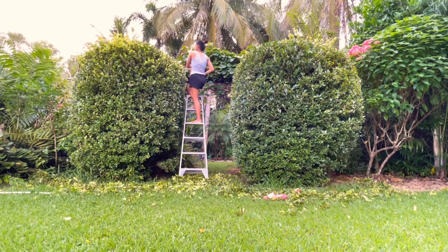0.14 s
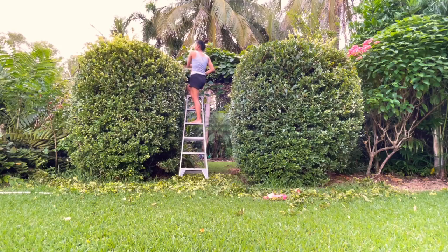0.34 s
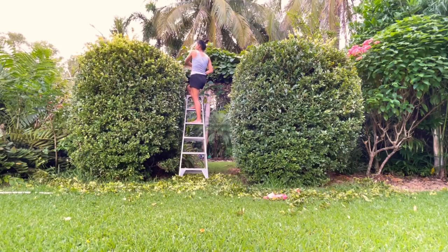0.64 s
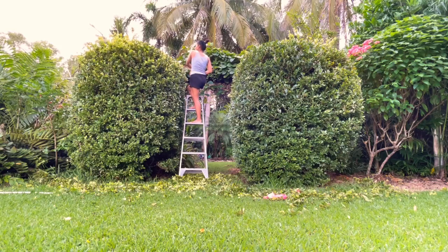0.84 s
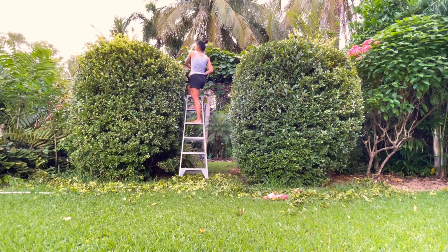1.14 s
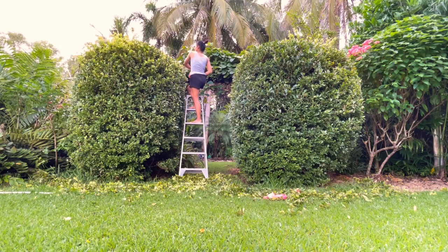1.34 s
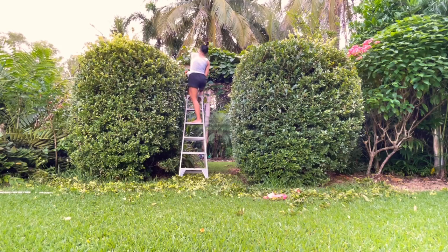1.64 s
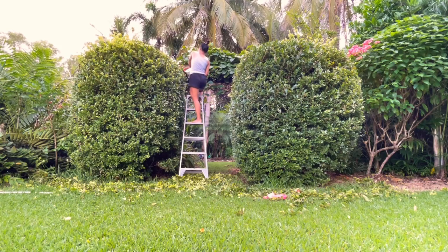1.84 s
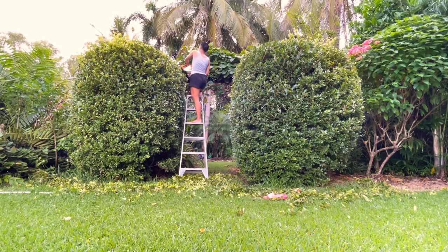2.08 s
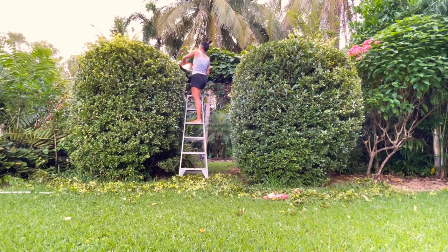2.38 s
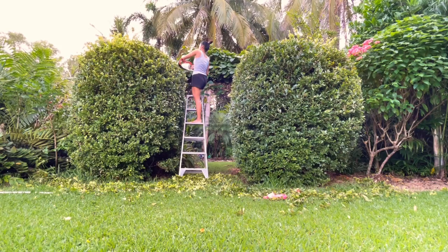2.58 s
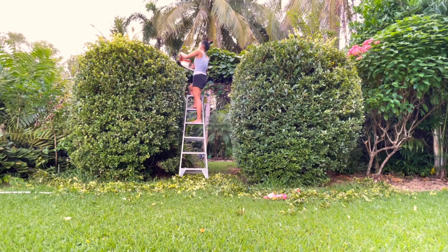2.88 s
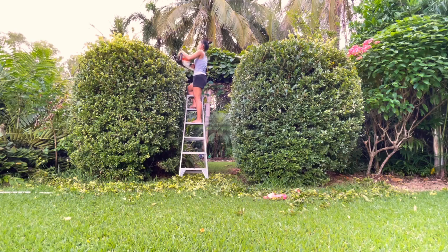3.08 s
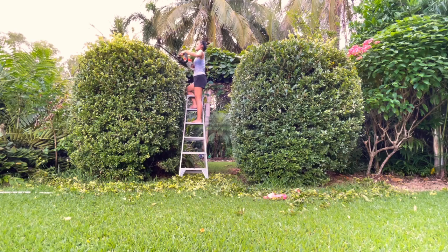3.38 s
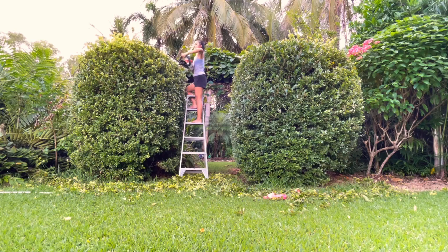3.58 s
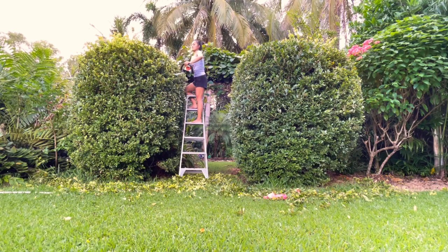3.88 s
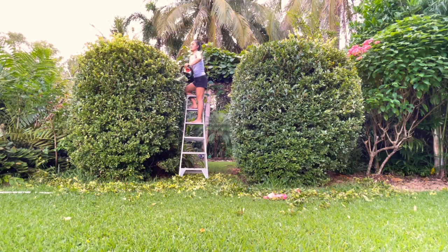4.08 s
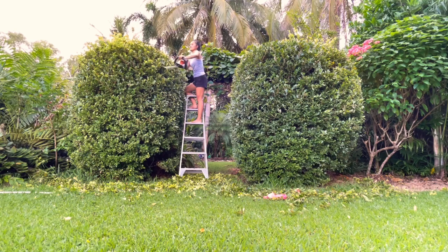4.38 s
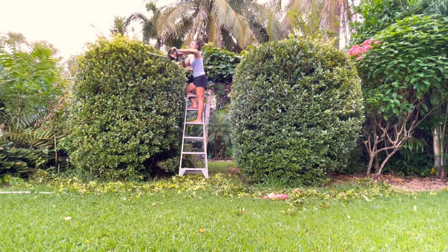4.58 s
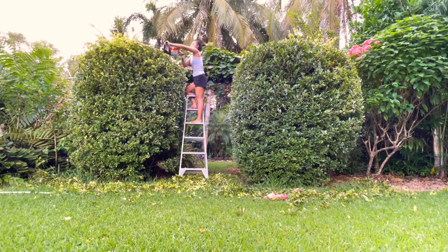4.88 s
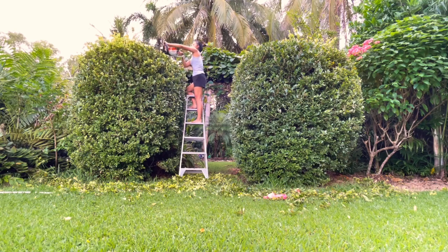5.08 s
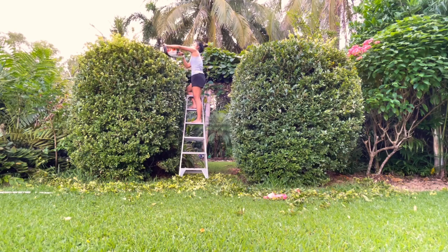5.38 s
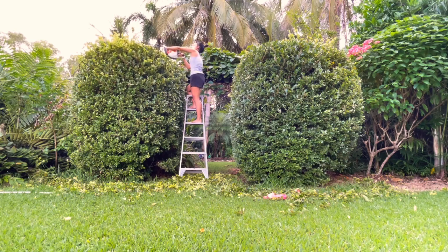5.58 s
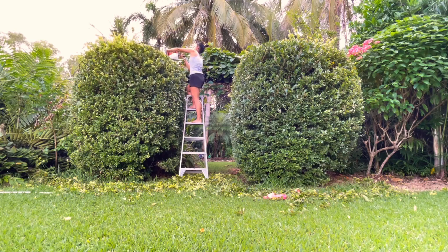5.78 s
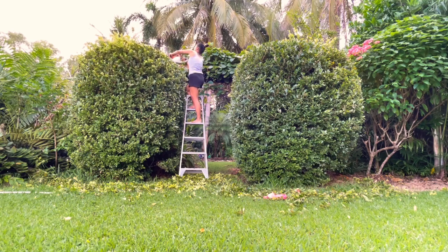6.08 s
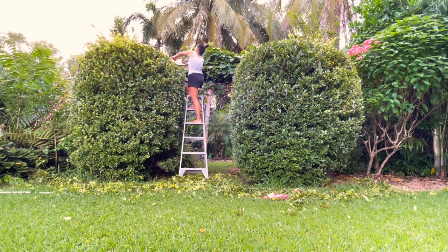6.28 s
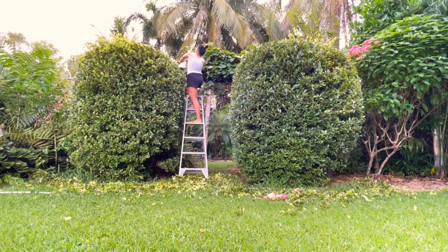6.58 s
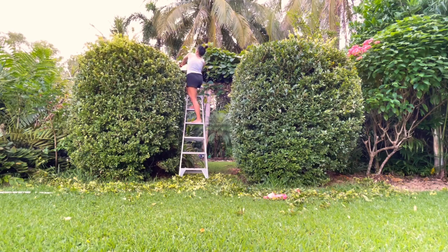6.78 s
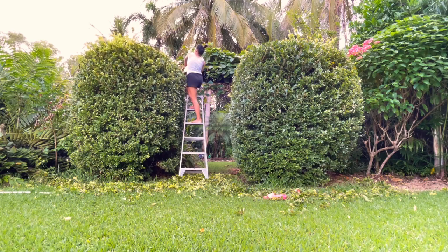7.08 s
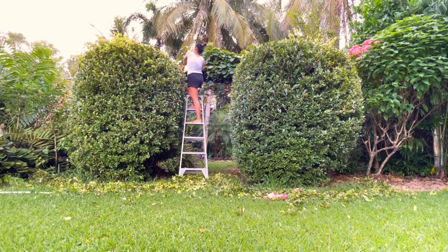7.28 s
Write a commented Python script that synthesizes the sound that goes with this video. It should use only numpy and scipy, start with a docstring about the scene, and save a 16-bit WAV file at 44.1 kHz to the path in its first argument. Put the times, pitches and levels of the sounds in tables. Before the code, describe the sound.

Twigs snap and a distant dove coos before an electric hedge trimmer buzzes and rattles through foliage, stops briefly, clicks, then cuts on.

```python
"""First a low rumble and insects in a garden, with twigs snapping, a dove's coos and a bird's whistles.
Then a powered hedge trimmer, some metres from two microphones, works a hedge top in two runs.
A pulsed hum and high motor orders make its motor; at each blade reversal, blows ring bar and housing.
Shaped noise scrapes between the blows. In the pause come a bar ringing out, a sharp click and more
rustling; noise shaped by spectra makes the foliage and rumble, wavering tones make the birds."""
import sys
import numpy as np
from scipy import signal
from scipy.fft import rfft, irfft, next_fast_len
from scipy.io import wavfile
from scipy.ndimage import uniform_filter1d

SR = 44100
rng = np.random.default_rng(int(sys.argv[2]) if len(sys.argv) > 2 else 0)


def transcribe(u):
    """Save the signal u as a 16-bit wav file named by the first command-line argument.

    u: samples, shape (n,) or (channels, n), limited to [-1, 1]; the rate is SR.
    q: integer samples, one column per channel.
    """
    v = np.clip(np.atleast_2d(u).T, -1, 1)
    q = np.round(v * 32767).astype(np.int16)
    wavfile.write(sys.argv[1], SR, q)


N = 328089
T = np.arange(N) / SR
FREQS = np.fft.rfftfreq(N, 1 / SR)

# Garden rumble, shape of the spectrum. Each row: frequency in Hz, level in dB.
RUMBLE_SPECTRUM = [(20, -36), (35, -17), (52, 0.5), (85, 2.5), (130, 1), (160, -11), (250, -15), (350, -25),
                   (500, -39.5), (1500, -62), (4000, -75), (13000, -75)]
# Insect chorus. Each row: frequency in Hz, half width in Hz, level in dB.
INSECT_BANDS = [(5670, 440, -63.5), (9250, 48, -73.5)]
# Dove. Each row: start in seconds, length in seconds, pitch in Hz, level in dB before the trees' echo.
DOVE_COOS = [(0.207, 0.14, 673, -63.5), (0.585, 0.11, 622, -60), (0.866, 0.048, 705, -51),
             (0.93, 0.052, 657, -59), (1.133, 0.18, 615, -64), (3.854, 0.1, 677, -57.5)]
# Small bird. Each row: start in seconds, length in seconds, first pitch in Hz, last pitch in Hz,
# level in dB before the trees' echo, flutter as a share of the pitch.
BIRD_WHISTLES = [(0.762, 0.29, 2490, 2580, -69, 0.063), (0.84, 0.084, 2580, 2560, -66, 0.037),
                 (1.189, 0.17, 3260, 2490, -61, 0.022), (1.276, .15, 3000, 2750, -64, 0.077),
                 (1.323, 0.12, 2510, 2120, -58, 0.071)]
# Foliage brushing the tool, or cuttings settling. Each row: middle in seconds, half width in seconds,
# twigs in dB, leaves in dB before the leaf gain.
FOLIAGE_BRUSHES = [(.1, 0.15, -61, -63), (.62, 0.14, -75, -74), (1.2, 0.11, -72, -82),
                   (1.405, 0.05, -51, -70.5), (3.7, 0.36, -69, -77)]
# Snaps of twigs and leaves. Each row: start in seconds, level in dB, treble in dB relative to it
# before the leaf gain, t60 in seconds.
TWIG_SNAPS = [(0.063, -42.5, -10.5, 0.083), (0.439, -58, -9, 0.049), (0.514, -49, -22, 0.067),
              (0.603, -50, -9, 0.05), (0.662, -61, 0, 0.053), (1.043, -43, -7.5, 0.14),
              (1.085, -65, -5, 0.098), (1.122, -47.5, -7, 0.13), (1.215, -55, -7, 0.12),
              (1.326, -54, -26, 0.078), (1.397, -48, -15, 0.06), (3.821, -48.5, 3, 0.2),
              (3.907, -56, -5, 0.09)]
# Woody part of the foliage, shape of the spectrum. Each row: frequency in Hz, level in dB.
WOOD_SPECTRUM = [(300, -3), (600, -0.5), (800, 2), (1000, -5), (1350, 6), (2000, 2), (2600, -7),
                 (4000, -12), (9000, -46)]
# Leafy part of the foliage, shape of the spectrum. Each row: frequency in Hz, level in dB.
LEAF_SPECTRUM = [(1500, -2), (2800, 8.5), (4200, 6), (6000, 7), (9000, 1.5), (13000, -4.5)]
# Branches bumping the resting bar. Each row: start in seconds, level in dB, ring in Hz, t60 in seconds.
BRANCH_BUMPS = [(0.064, -60, 1460, 0.15), (1.214, -58, 1520, 0.12), (1.234, -44, 1470, 0.068),
                (1.325, -51, 1340, 0.081), (1.366, -45.5, 1180, 0.21), (3.853, -55, 1390, .1),
                (3.906, -49, 1450, 0.096)]
# Steel modes of the click before the second run. Each row: frequency in Hz, level in dB, t60 in seconds.
CLICK_MODES = [(2300, -55, 0.45), (2940, -41, 0.11), (3040, -38, 0.19), (3300, -43, .08), (3550, -43, 0.11),
               (5170, -40, 0.2), (6070, -46, 0.19), (6500, -54, .15), (6900, -53, 0.099), (8500, -47, .1),
               (11500, -52, 0.089)]
# Trigger pulls. Each row: start in seconds, release in seconds, time constant of noise build-up in seconds.
TRIGGER_RUNS = [(1.483, 3.369, 0.097), (3.936, 7.6, 0.32)]
# One blade reversal in each run, to set the phase of the strokes. Each entry: time in seconds.
REVERSAL_TIMES = [2.119, 4.868]
# Motor speed under load, before spin-up and coasting. Each row: time in seconds, turns per second in Hz.
MOTOR_SPEED = [(1.65, 405), (1.9, 406.4), (2.3, 405.1), (2.8, 408), (3.38, 407), (4.15, 403.5),
               (4.4, 407.1), (4.8, 405.5), (5.15, 401.7), (5.6, 405.1), (5.95, 399.7), (6.2, 402.5),
               (6.45, 399.8), (7.1, 408.1)]
# Motor hum under load. Each row: time in seconds, level in dB.
HUM_LEVEL = [(1.6, -55), (2.1, -46), (2.7, -46), (3.25, -42), (4.15, -55), (4.6, -43), (5.1, -40),
             (6.5, -46), (7.0, -49.5)]
# Motor whine under load. Each row: time in seconds, level in dB.
WHINE_LEVELS = [(1.7, -45), (2.15, -44), (2.33, -34), (2.5, -41), (3.3, -39), (4.5, -41), (4.6, -34),
                (4.8, -39), (5.4, -41), (6.0, -42), (6.35, -40), (6.85, -40), (7.3, -44)]
# Motor orders in the whine. Each row: multiple of the shaft speed, level in dB relative to the whine.
WHINE_ORDERS = [(12, 2.5), (16, -12), (18, -14), (20, -15)]
# Cutting noise before each part's gain. Each row: time in seconds, clatter in dB,
# housing boom in dB relative to the clatter, scrape in dB relative to the clatter.
CUTTING_LEVELS = [(1.7, -32.5, -6.5, -5.0), (2.1, -31, -7.5, -6), (2.5, -30, -3.5, -6),
                  (2.85, -30, -3.5, -5.5), (3.03, -31.5, -3, -1.5), (3.3, -27.5, -6, -4.5),
                  (4.2, -25, -2.5, -1), (4.35, -28.5, -1, 0), (4.8, -29, -4.5, -2),
                  (5.5, -32.5, -1.5, -2.5), (6.0, -30, -3.5, -5.5), (6.35, -30.5, -9, -8.5),
                  (6.7, -31, -8, -7), (7.1, -34.5, -3.5, -4), (7.4, -33.5, -4.5, -4.5)]
# Main peak of the clatter as the tool swings. Each row: time in seconds, frequency in Hz.
MAIN_PEAK = [(1.8, 1500), (2.1, 1380), (4.15, 1350), (4.66, 1160), (5.0, 1196), (5.65, 1210), (6.3, 1316),
             (7.2, 1520)]
# Bar sweeps that bring out the upper peak. Each row: middle in seconds, half width in seconds, lift in dB.
BAR_SWEEPS = [(2.9, 0.2, 10.5), (3.3, 0.055, 6), (4.85, 0.54, 6.5), (5.97, 0.21, 9)]
# Loudest knocks, on thick twigs. Each row: time in seconds, reference level in dB for tap and chatter.
TWIG_KNOCKS = [(1.53, -30), (1.631, -22), (1.674, -21), (1.716, -23), (1.826, -19), (1.869, -21),
               (1.887, -19), (2.055, -19), (2.078, -19), (2.12, -17), (2.165, -19), (2.182, -19),
               (2.395, -19), (2.42, -18), (2.755, -18), (2.825, -19), (2.902, -19), (2.988, -18),
               (3.115, -19), (3.139, -18), (3.158, -18), (3.262, -16), (3.304, -17), (3.347, -18),
               (3.366, -18), (4.191, -15), (4.254, -18), (4.317, -17), (4.383, -16), (4.725, -17),
               (4.741, -17), (4.868, -15), (5.171, -19), (5.276, -18), (5.661, -20), (5.679, -18),
               (5.807, -19), (6.022, -19), (6.149, -19), (6.278, -16), (6.365, -18), (6.58, -18),
               (6.731, -20), (6.794, -21), (6.95, -21), (7.027, -21)]
# Housing thuds in each stroke. Each row: delay in strokes, half width in strokes,
# height as a multiple of the steady boom.
HOUSING_THUDS = [(.22, 0.18, 1), (.57, 0.093, 1)]
# Teeth singing as they rub. Each row: middle in seconds, half width in seconds, frequency in Hz, lift in dB.
TEETH_SINGS = [(2.0, 0.17, 8560, 8), (2.5, 0.026, 6350, 2), (4.35, 0.11, 7330, 6.5),
               (7.35, 0.12, 8500, 7.5)]
# Blade clatter, shape of the spectrum before the moving peaks. Each row: frequency in Hz, level in dB.
CLATTER_SPECTRUM = [(700, -15.5), (940, -6.5), (1140, 0.5), (1350, -1), (1640, -2.5), (1980, -3),
                    (2150, -7.5), (2400, -14.5), (2800, -15.5), (3800, -21), (8000, -33), (14000, -65)]
# Housing boom, shape of the spectrum. Each row: frequency in Hz, level in dB.
HOUSING_SPECTRUM = [(100, -49), (200, -25), (320, -17), (450, -1.5), (600, 3.5), (750, 5), (850, -0.5),
                    (1000, -6.5), (1500, -41)]
# Tooth scrape, shape of the spectrum before rasp and singing. Each row: frequency in Hz, level in dB.
SCRAPE_SPECTRUM = [(1500, -7.5), (2700, 6), (3700, 1.5), (4500, -1), (4850, 3), (5150, 2), (6300, 1.5),
                   (7600, -2), (8500, -2.5), (9400, -2), (11500, -7), (13000, -3.5)]
# Likeness of noise at the two microphones. Each row: frequency in Hz, share from 0 to 1.
MIC_LIKENESS = [(60, 1), (300, 0.71), (700, 0.94), (1400, 0.84), (3000, 0.71), (4500, 0.45), (7000, 0.4),
                (9500, 1), (12000, 0.94)]
# Phase lead of the left microphone for the hedge. Each row: frequency in Hz, lead in radians.
LEFT_LEAD = [(100, 0.5), (500, 0.57), (1500, 1), (2000, 1), (2700, 2), (3700, 3.5), (5400, 4), (6200, 7),
             (8000, 7.5), (9000, 5), (9600, 3.5), (10600, 6), (11800, -2.5), (13000, 0.5)]
# Left level over right for the hedge. Each row: frequency in Hz, difference in dB.
LEFT_TILT = [(250, -1.5), (500, -0.5), (1000, 4.5), (2000, -1), (4000, 3), (8000, 0.4), (12000, 0)]
# Overall tone: a narrow gap near 10 kHz and little above 13 kHz. Each row: frequency in Hz, gain in dB.
OVERALL_TONE = [(20, -7.5), (9300, -0.5), (9650, 12.5), (9800, -57), (10300, -70), (10550, -4),
                (11300, 9.5), (12900, -4), (13200, -16), (13500, -24), (15000, -24)]

RUMBLE_START_DB = -43
COO_ARCH, COO_SAG, COO_FLUTTER = 0.026, 0.039, 0.068  # shares of a coo's pitch
TREES_T60_S, TREES_ECHO_DB = 0.65, -6
STIR_DB = -76.5  # leaves that stir all the time, before the leaf gain
RING_DB, RING_T60_S, RING_HZ, RING_WIDTH_HZ = -30, 0.36, 1420, 270  # the bar after the first release
BUMP_WIDTH_HZ = 105  # half width of a bumped bar's ring
CLICK_S, CLICK_SPREAD = 3.819, 0.017  # spread: half width of a cluster, as a share of its frequency
GEAR = 8.61  # motor turns to a blade stroke
SPIN_UP_S, COAST_S = 0.035, 0.313  # time constants of the motor's speed
UNLOAD_DB, UNLOAD_S, COAST_DB_PER_S = 4, 0.021, 141  # quick drop on release, on top of a steady run-down
WHINE_FLICKER_DB, WHINE_COAST_DB_PER_S = 2.3, 500  # the whine's extra fall after release
BLOW_SHARE, COAST_BLOW_SHARE = 0.62, 0.45  # share of blows in the clatter, at full and at low noise
SCRAPE_POWER, BOOM_POWER = 1.15, 1.1  # scrape and boom build up later than the clatter
BOOM_FLICKER_DB = 1.5  # the housing answers some strokes more than others
BOOM_COAST_DB_PER_S = 106  # the housing's extra fall after release
TAP_DB, TAP_SPREAD_DB, TAP_DELAY_S = 17, 2.5, 0.0018  # a reversal's tap over the clatter level
KNOCK_TAP_DB, KNOCK_DB, KNOCK_T60_S = 6, -9.5, 0.08  # first tap, then chatter, over a knock's table level
TAP_BOOM_DB, KNOCK_BOOM_DB = -2.5, -9  # housing share of taps (on top of the boom level) and of knocks
REBOUND, REBOUND_S = 0.3, 0.00181  # strength and usual delay of a tap's rebound
UPPER_HZ, UPPER_AT_HZ = 1960, 1277  # the upper peak when the main one is at UPPER_AT_HZ
UPPER_FOLLOWS, UPPER_DB = 0.75, 0  # power by which it follows the main peak, and its usual lift
RASP_PER_DB, RASP_EVEN_DB = 0.69, -2  # a scrape weaker than RASP_EVEN_DB gains low treble
SING_WIDTH_HZ = 180  # half width of a singing band
EDGE_HZ = 15700


def amp(db):
    """Decibels to gain."""
    return 10 ** (np.asarray(db) / 20)


def unit(x):
    """Scales to rms 1."""
    return x / np.sqrt(np.mean(x ** 2) + 1e-20)


def bump(x, centre, width):
    """A bell of height 1, along frequency or time."""
    return np.exp(-.5 * np.clip((x - centre) / width, -10, 10) ** 2)


def read(points, hz):
    """Reads a spectrum table on a log-frequency axis."""
    f, value = np.transpose(points)
    return np.interp(np.log(hz + 1), np.log(np.sort(f) + 1), value)


def curve(rows, axis=1):
    """One column of a time table at every sample."""
    rows = np.asarray(rows)
    return np.interp(T, rows[:, 0], rows[:, axis])


def drift(per_s):
    """A random wander of rms 1, with per_s fresh values a second joined by lines."""
    knots = rng.standard_normal(8000)
    return unit(np.interp(T * per_s, np.arange(len(knots)), knots))


def filtered(x, gain):
    """Applies a gain that is a function of frequency."""
    size = next_fast_len(N + 4096, True)
    return irfft(rfft(x, size) * gain(np.fft.rfftfreq(size, 1 / SR)), size)[..., :N]


def colour(x, points):
    """Shapes a white sound by a spectrum, keeping its power."""
    norm = np.sqrt(np.mean(amp(read(points, FREQS[::20])) ** 2))
    return filtered(x, lambda hz: amp(read(points, hz)) / norm)


def pair():
    """White noise at two microphones, partly alike."""
    a, b = rng.standard_normal((2, N))
    same = lambda hz: np.clip(read(MIC_LIKENESS, hz), 0, 1)
    other = filtered(a, same) + filtered(b, lambda hz: np.sqrt(1 - same(hz) ** 2))
    return np.array([a, other])


def shimmer(x, depth_db, size):
    """Narrow bands flicker up and down; size is (bins, frames)."""
    z = signal.stft(x, nperseg=2048)[2]
    patches = rng.standard_normal(z.shape[1:])
    for axis in (0, 1, 0, 1):
        patches = uniform_filter1d(patches, size[axis], axis)
    return signal.istft(z * unit(amp(depth_db * unit(patches))), nperseg=2048)[1][:, :N]


def burst(s, t60, crack=1.2):
    """An envelope that cracks at s and dies away."""
    out = np.zeros(N)
    first = max(int(s * SR), 0)
    age = T[:min(N - first, SR // 2)]
    decay = amp(-60 * age / max(t60, .01)) + crack * np.exp(-age / 0.0038)
    out[first:first + len(age)] = (1 - np.exp(-age / 0.00064)) * decay
    return out


def ring(envelope, hz, width_hz):
    """Noise in a bell-shaped band stands for a cluster of close steel modes under an envelope."""
    return envelope * unit(filtered(rng.standard_normal(N), lambda f: bump(f, hz, width_hz)))


def garden():
    """Low rumble of far traffic, rising slightly, and a steady insect chorus, all from filtered noise."""
    rise_db = 0.54 * T / T[-1]
    rumble = amp(RUMBLE_START_DB + rise_db) * colour(pair(), RUMBLE_SPECTRUM)
    rumble *= amp([[-1], [1.1]])  # left a little weaker than right
    chorus = sum(amp(db) * unit(filtered(rng.standard_normal((2, N)), lambda f: bump(f, hz, width)))
                 for hz, width, db in INSECT_BANDS)
    return rumble + chorus


def note(s, length, db, flutter, pitch):
    """A wavering tone that swells and fades; pitch gives Hz from the share of the note that has passed."""
    age, out = T[:int(length * SR)], np.zeros(N)
    u, first = age / length, int(s * SR)
    quick, sway = (np.interp(age * per_s, np.arange(400), rng.standard_normal(400)) for per_s in (600, 40))
    hz = pitch(u) * (1 + flutter * quick + .007 * sway)
    swell = np.sqrt(2 * np.sin(np.pi * u))
    out[first:first + len(u)] = amp(db) * swell * np.sin(2 * np.pi * np.cumsum(hz) / SR)
    return out


def birds():
    """Distant wavering coos and whistles, blurred by echoes among the trees (a decaying noise tail)."""
    song = sum(note(s, length, db, COO_FLUTTER,
                    lambda u: hz * (1 + COO_ARCH * np.sin(np.pi * u) - COO_SAG * u))
               for s, length, hz, db in DOVE_COOS)
    song += sum(note(s, length, db, flutter, lambda u: first + (last - first) * u)
                for s, length, first, last, db, flutter in BIRD_WHISTLES)
    song *= unit(amp(2.5 * drift(70)))
    tail = rng.standard_normal((2, SR // 2)) * amp(-60 * T[:SR // 2] / TREES_T60_S)
    tail /= np.linalg.norm(tail[0])
    echo = signal.fftconvolve(song[None], tail, axes=1)[:, :N]
    return .85 * song + amp(TREES_ECHO_DB) * echo


def foliage(leaf_db=5.5):
    """Twigs crack with a woody knock and a crackle of leaves: two noises under shared bursts and swells."""
    swells = amp(STIR_DB) + sum(amp([[twigs_db], [leaves_db]]) * bump(T, s, width)
                                for s, width, twigs_db, leaves_db in FOLIAGE_BRUSHES)
    wood, leaves = swells * unit(amp(2 * drift(39)))
    for s, db, treble_db, t60 in TWIG_SNAPS:
        snap = amp(db) * burst(s, t60, crack=0.45)
        wood = wood + snap * np.sqrt(np.clip(1 - amp(treble_db) ** 2, .02, 1))
        leaves = leaves + snap * amp(treble_db)
    crackle = unit(amp(0.28 * drift(780)))
    woody = colour(pair() * wood, WOOD_SPECTRUM)
    return woody + amp(leaf_db) * colour(pair() * leaves * crackle, LEAF_SPECTRUM)


def resting_bar():
    """The bar rings out when the trigger is first released, and briefly whenever branches bump it."""
    freed = T - TRIGGER_RUNS[0][1]
    fade = amp(RING_DB - 60 * abs(freed) / RING_T60_S) * (freed > 0)
    bumps = sum(ring(amp(db) * burst(s, t60, crack=.2), hz, BUMP_WIDTH_HZ)
                for s, db, hz, t60 in BRANCH_BUMPS)
    return ring(fade, RING_HZ, RING_WIDTH_HZ) + bumps


def click():
    """Clusters of steel modes ring briefly after one tap on the tool."""
    return sum(ring(amp(db) * burst(CLICK_S, t60, crack=.15), hz, CLICK_SPREAD * hz)
               for hz, db, t60 in CLICK_MODES)


def trigger(start, release, build_s):
    """One pull: motor speed in Hz and the share of full noise, from spin-up to coasting."""
    held, freed = np.maximum(T - start, 0), np.maximum(T - release, 0)
    speed = curve(MOTOR_SPEED) * (1 - np.exp(-held / SPIN_UP_S)) * np.exp(-freed / COAST_S)
    fade_db = UNLOAD_DB * np.minimum(freed / UNLOAD_S, 1) + COAST_DB_PER_S * freed
    return speed, (1 - np.exp(-held / build_s)) * amp(-fade_db)


def motor(turns, strokes, freed):
    """Shaft hum, swayed by each blade stroke, and the thin whine of the high orders."""
    hum = np.sqrt(2) * np.sin(2 * np.pi * turns + 0.12 * drift(60))
    hum += .45 * np.sin(2 * np.pi * (turns + strokes))
    hum += .2 * np.sin(2 * np.pi * (turns - strokes))
    shaft = 2 * np.pi * turns + .025 * np.sin(2 * np.pi * strokes) + .035 * drift(70)
    whine = sum(amp(db) * unit(amp(WHINE_FLICKER_DB * drift(45))) * np.sin(round(k) * shaft)
                for k, db in WHINE_ORDERS)
    whine_db = curve(WHINE_LEVELS) - WHINE_COAST_DB_PER_S * freed
    return amp(curve(HUM_LEVEL)) * hum + amp(whine_db) * whine


def clacks(strokes, uneven_db=1.6, play=.025):
    """Each reversal takes up the drive's play, a sharp blow and chatter; gives envelope and age in strokes."""
    size, slip = rng.uniform(-1, 1, 400), rng.standard_normal(400)
    hits = np.sort(np.arange(-200, 200) + play * slip)  # in strokes
    last = np.maximum(np.searchsorted(hits, strokes) - 1, 0)
    age = strokes - hits[last]
    blow = (1 - np.exp(-age / .02)) * (.6 * np.exp(-age / .12) + np.exp(-(age / .62) ** 2))
    return unit(.2 + amp(uneven_db * size[last]) * blow), age


def taps(times, gains):
    """Sharp taps of steel on steel, each with one quick rebound of either sign."""
    out = np.zeros(N + SR)
    for s, gain, (late, side) in zip(times, gains, rng.uniform(-1, 1, (N, 2))):
        out[int(s * SR)] += gain
        rebound_s = s + REBOUND_S * (1 + .5 * late)
        out[int(rebound_s * SR)] += np.sign(side) * REBOUND * gain
    return out[:N]


def rattle(age, repeat=0.2):
    """Every blow starts the same jangle of the steel, mixed with fresh noise."""
    place = (age * SR / 47).astype(int) % SR  # at about 47 strokes a second
    share = np.clip(repeat, 0, 1)
    return np.sqrt(share) * pair()[:, SR + place] + np.sqrt(1 - share) * pair()


def bar_ring(x, main_db=5):
    """The blade bar's broad ring, with two peaks that move as the tool is swung."""
    hz, t, z = signal.stft(x, SR, nperseg=512, noverlap=384)
    main_hz = np.interp(t, *np.transpose(MAIN_PEAK))
    upper_hz = UPPER_HZ * (main_hz / UPPER_AT_HZ) ** UPPER_FOLLOWS
    upper_db = UPPER_DB + sum(db * bump(t, s, width) for s, width, db in BAR_SWEEPS)
    hz = hz[:, None]
    peaks_db = main_db * bump(hz, main_hz, 64) + upper_db * bump(hz, upper_hz, 150)
    gain = amp(read(CLATTER_SPECTRUM, hz) + peaks_db)
    z = z * gain / np.sqrt(np.mean(gain ** 2, axis=0))
    return signal.istft(z, nperseg=512, noverlap=384)[1][:, :N]


def ground_notch(x, depth_db=7.5, place=0.714, width_hz=65):
    """The echo off the lawn cancels a narrow band below the main peak, and moves with it."""
    hz, t, z = signal.stft(x, SR, nperseg=1024, noverlap=768)
    notch_hz = place * np.interp(t, *np.transpose(MAIN_PEAK))
    z = z * amp(-depth_db * bump(hz[:, None], notch_hz, width_hz))
    return signal.istft(z, nperseg=1024, noverlap=768)[1][:, :N]


def tooth_scrape(teeth, scrape_db):
    """Teeth bite through leaves: grainy noise, coarser when weak, with bands that sing for a moment."""
    bites = (rng.random(N) < 260 / SR) * amp(3.0 * np.minimum(rng.exponential(1, N), 3))  # 260 a second
    grain = unit(1 + 0.14 * signal.lfilter([1], [1, -np.exp(-1 / (0.002 * SR))], bites))
    grain *= unit(amp(.8 * drift(22)))  # the leaves come in clumps
    scrape = amp(3.5) * colour(pair() * teeth * grain, SCRAPE_SPECTRUM)
    rasp = amp(RASP_PER_DB * (RASP_EVEN_DB - scrape_db)) - 1
    scrape += rasp * filtered(scrape, lambda hz: bump(hz, 4300, 1500))
    scrape += sum((amp(db) - 1) * bump(T, s, width)
                  * filtered(scrape, lambda f: bump(f, hz, SING_WIDTH_HZ))
                  for s, width, hz, db in TEETH_SINGS)
    return shimmer(scrape, depth_db=2.2, size=(6, 5))


def trimmer():
    """Blade blows ring the bar and housing, while the teeth scrape and the motor whines."""
    bar, housing, teeth, tones, ages, cracks = np.zeros((6, N))
    level_db, boom_db, scrape_db = (curve(CUTTING_LEVELS, axis) for axis in (1, 2, 3))
    for (start, release, build_s), reversal in zip(TRIGGER_RUNS, REVERSAL_TIMES):
        speed, running = trigger(start, release, build_s)
        freed = np.maximum(T - release, 0)
        turns = np.cumsum(speed) / SR
        strokes = (turns - np.interp(reversal, T, turns)) / GEAR
        blows, age = clacks(strokes)
        ages = np.where(T > start, age, ages)
        drive = np.clip(running, COAST_BLOW_SHARE, min(BLOW_SHARE, 1))
        bar += running * amp(level_db) * (1 - drive + drive * blows)
        thuds = unit(1 + sum(height * bump(age, delay, width) for delay, width, height in HOUSING_THUDS))
        thuds *= unit(amp(BOOM_FLICKER_DB * drift(47)))
        housing_db = level_db + boom_db - BOOM_COAST_DB_PER_S * freed
        housing += running ** BOOM_POWER * thuds * amp(housing_db)
        teeth += running ** SCRAPE_POWER * amp(level_db + scrape_db) * unit(1 + 0.0094 * blows)
        tones += running * motor(turns, strokes, freed)
        at = np.flatnonzero((np.diff(age) < 0) & (T[1:] < release))  # the reversals
        tap_db = level_db + TAP_DB + TAP_SPREAD_DB * rng.uniform(-1, 1, N)
        cracks += taps(T[at] + TAP_DELAY_S, running[at] * amp(tap_db[at]))

    knock_s, knock_db = np.transpose(TWIG_KNOCKS)
    knock_tap_db = knock_db + KNOCK_TAP_DB
    bar_taps = cracks + taps(knock_s, amp(knock_tap_db))
    housing_taps = cracks * amp(boom_db + TAP_BOOM_DB) + taps(knock_s, amp(knock_tap_db + KNOCK_BOOM_DB))
    for s, db in TWIG_KNOCKS:  # a thick twig between the teeth makes a harder blow
        knock = amp(db + KNOCK_DB) * burst(s, KNOCK_T60_S, crack=0.88)
        bar = np.maximum(bar, knock)
        housing = np.maximum(housing, knock * amp(KNOCK_BOOM_DB))

    clatter = amp(1.5) * bar_ring(rattle(ages) * bar + bar_taps)
    boom = amp(2.0) * colour(rattle(ages, repeat=0.21) * housing + housing_taps, HOUSING_SPECTRUM)
    return ground_notch(clatter + boom) + tooth_scrape(teeth, scrape_db) + tones


def scene():
    """Hedge sound reaches the left microphone with a phase lead over most of the band; the garden surrounds."""
    left, right = trimmer() + resting_bar() + foliage() + click()
    left = filtered(left, lambda hz: amp(read(LEFT_TILT, hz) / 2) * np.exp(1j * read(LEFT_LEAD, hz)))
    right = filtered(right, lambda hz: amp(-read(LEFT_TILT, hz) / 2))
    return np.array([left, right]) + birds() + garden()


def record(dry):
    """The sound drops out briefly before the first run; then the overall tone and a low-pass band limit."""
    dropout = np.interp(T, [1.433, 1.438, 1.475, 1.505, 1.535], [1, .004, .004, .3, 1])
    heard = filtered(dry * dropout, lambda hz: amp(read(OVERALL_TONE, hz)))
    low_pass = signal.firwin(511, EDGE_HZ, window=("kaiser", 9), fs=SR)
    return signal.oaconvolve(heard, low_pass[None], "same")


dry = scene()
out = record(dry)
transcribe(out)
```